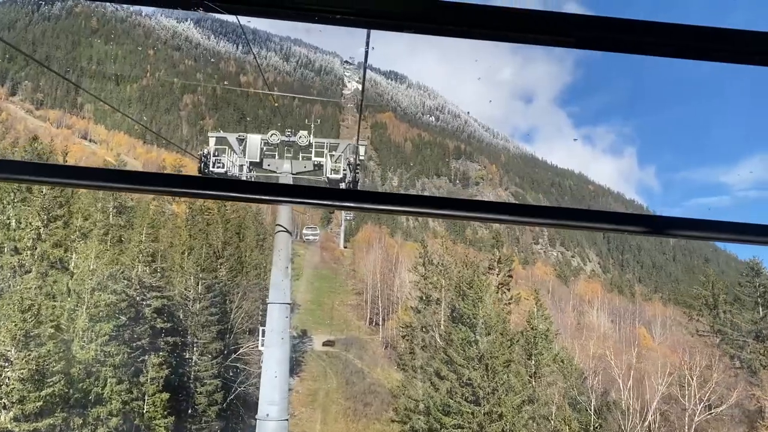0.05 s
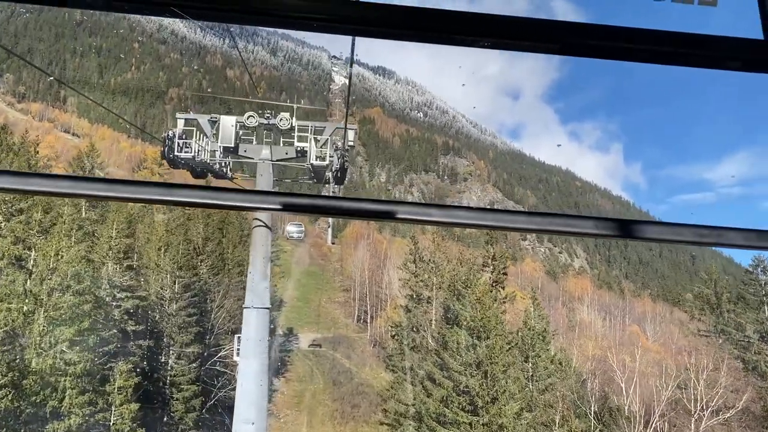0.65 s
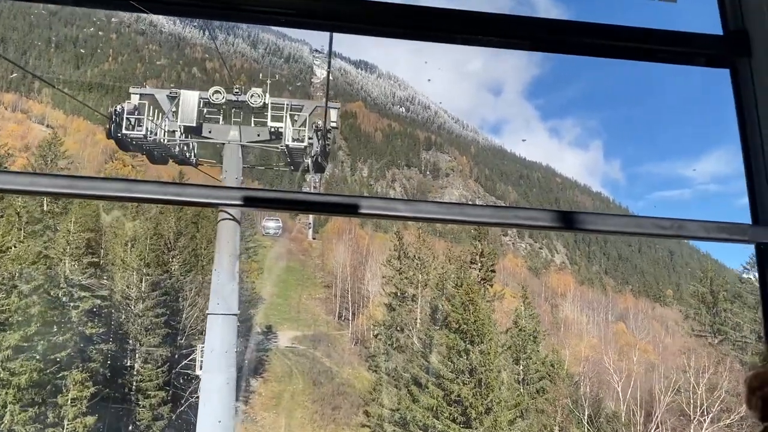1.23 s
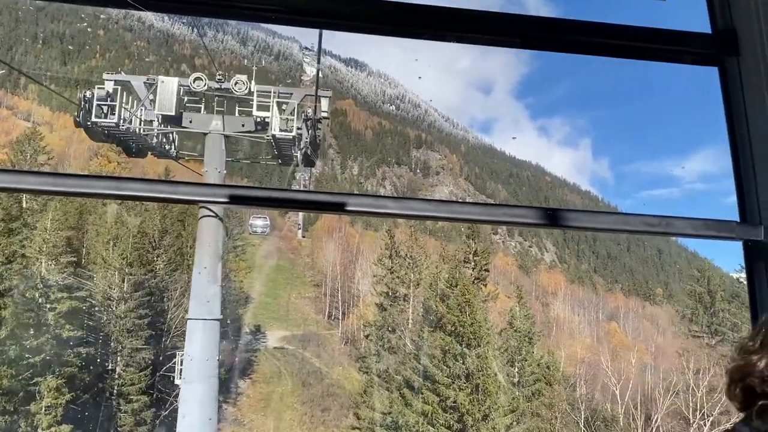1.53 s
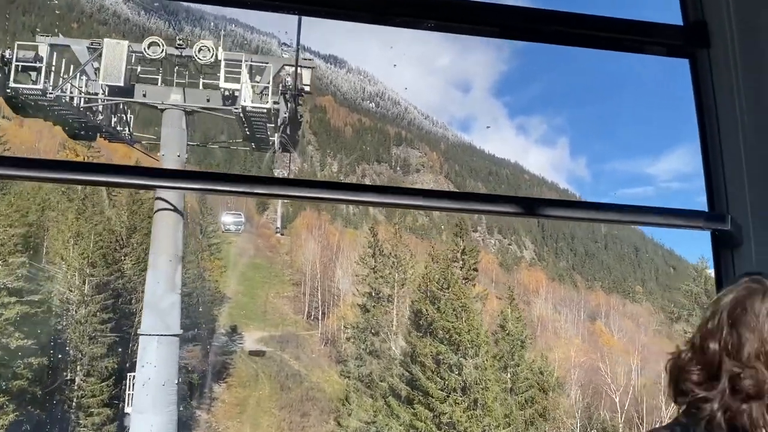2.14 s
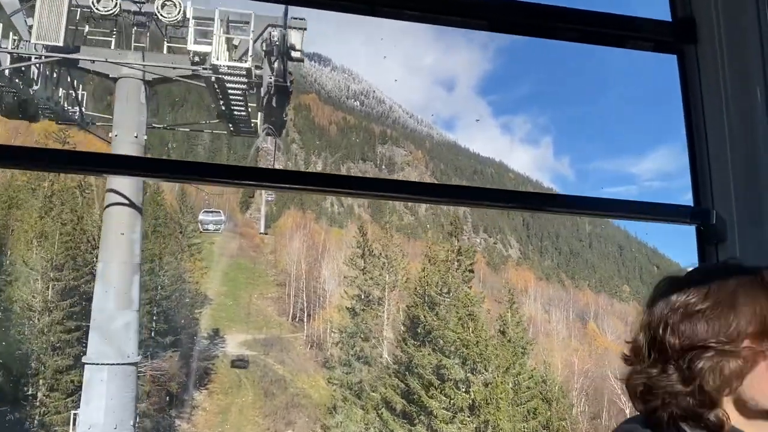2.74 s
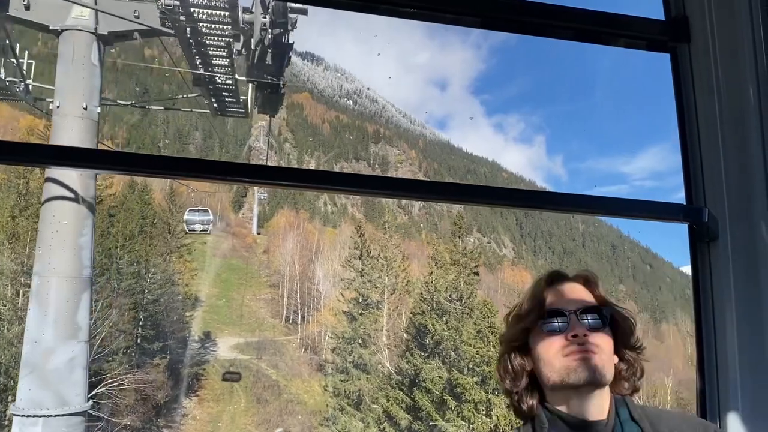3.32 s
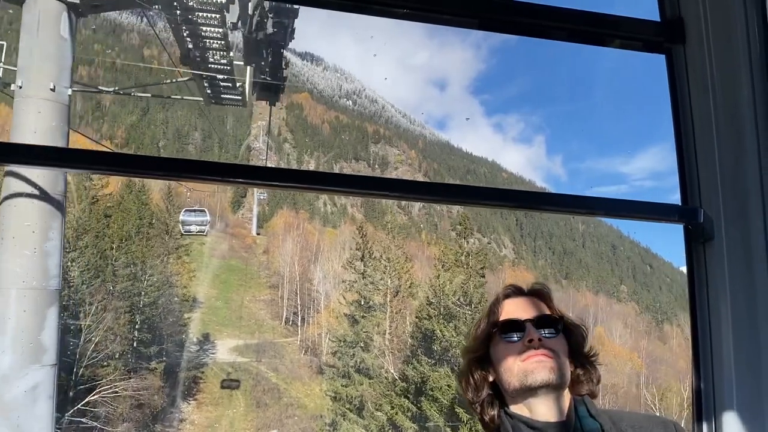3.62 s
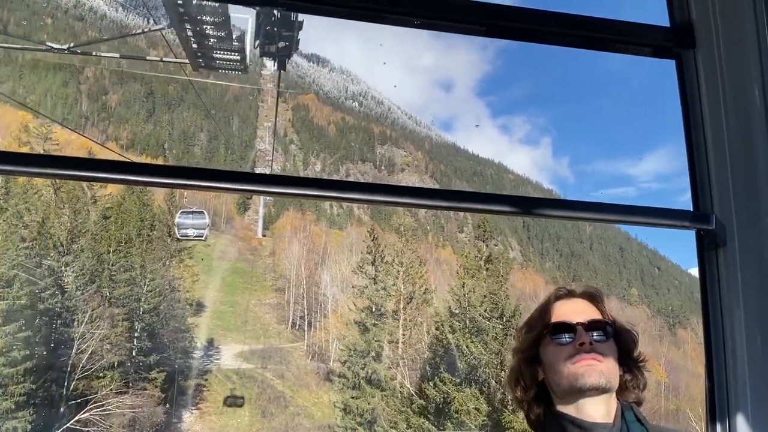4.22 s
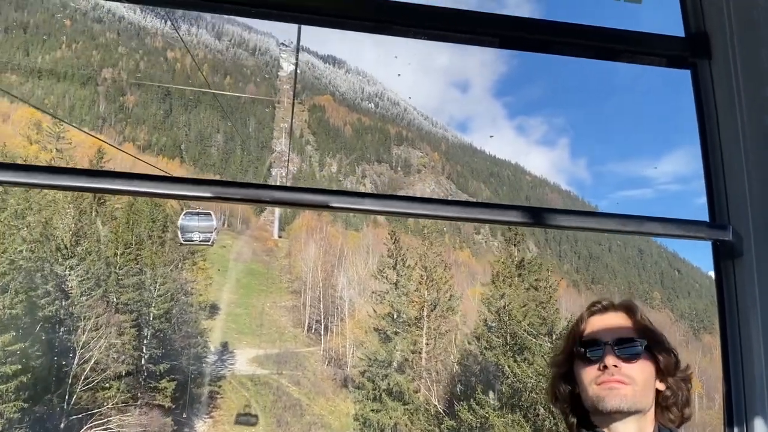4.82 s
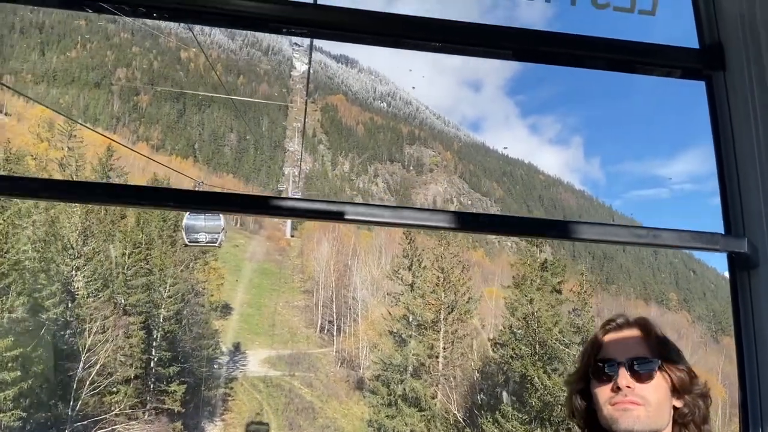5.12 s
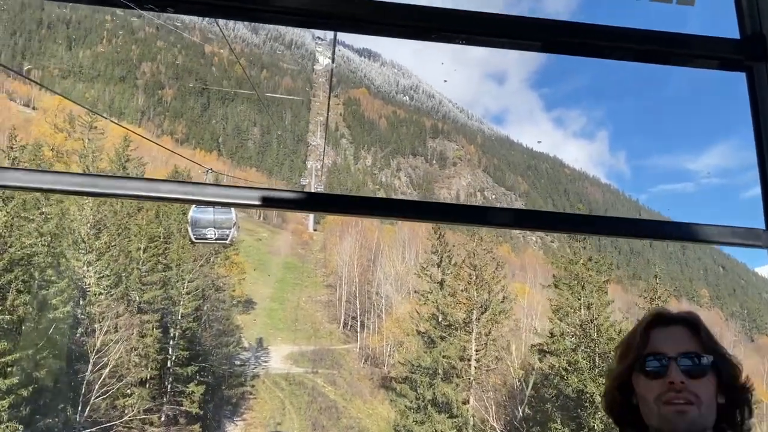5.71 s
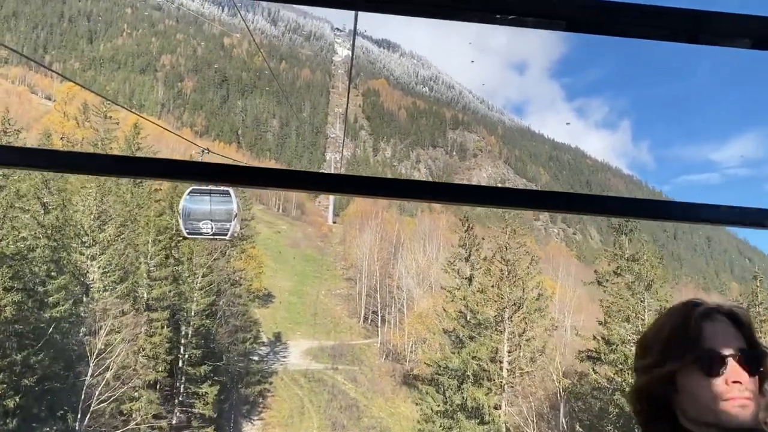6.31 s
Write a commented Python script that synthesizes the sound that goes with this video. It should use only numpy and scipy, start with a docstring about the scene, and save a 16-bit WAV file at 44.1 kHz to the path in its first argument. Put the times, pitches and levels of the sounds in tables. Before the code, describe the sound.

Inside a closed cable-car cabin, a low, throbbing hum from the cable runs throughout, over a soft rumble. Metal fittings click and ring lightly, most clearly at about 0.4, 1.1 and 1.4 seconds, with smaller knocks around 3 to 3.6 seconds. Clothing rustles faintly on and off. A brief low tone swells and sinks near 2 seconds. At about 4.5 seconds the cabin reaches a tower's wheels and the sound grows louder: a deep rumble with a rapid, uneven series of bumps, hollow panel thumps, sharp knocks and ticking trim. Around eight short, squeaky metallic creaks follow one another between 4.6 and 6 seconds, strongest near 5.0 and 5.7, while the hum stutters. After 6 seconds the shaking dies down, and the hum carries on slightly lower until the end at about 6.5 seconds. Everything sounds close and enclosed, as heard from a seat.

```python
"""Cable-car cabin passing a tower

The twisted rope runs over the tower's wheels and sends a throbbing hum down the hanger into the
closed cabin. Fittings click and ring, clothing rustles. From 4.5 s the grip rolls through the wheel
train: the cabin rumbles, each wheel creaks, loose panels thump and rattle. The hum ends a little lower."""
import sys
import numpy as np
from scipy import signal
from scipy.io import wavfile
from scipy.ndimage import uniform_filter1d

SR = 44100
rng = np.random.default_rng(int(sys.argv[2]) if len(sys.argv) > 2 else 0)


def bounce(signal):
    """Save signal as a 16-bit WAV file at the path given by the first command-line argument."""
    frames = np.transpose(np.atleast_2d(signal))
    limited = np.clip(frames, -1, 1)
    pcm = np.round(limited * 32767).astype(np.int16)
    wavfile.write(sys.argv[1], SR, pcm)


N = 288972
TIME = np.arange(N) / SR

# Table levels are relative; the functions add their own gains.
# cabin sound field (frequency [Hz], left-right correlation [-])
CORRELATION = [(60, 1), (130, 0.051), (300, 0.75), (640, -0.43), (1300, -0.46), (3000, -0.26),
               (7000, 0.076), (15000, 0.98)]
# cabin sound field (frequency [Hz], left minus right [dB])
BALANCE = [(30, 2), (90, 2.5), (250, 2), (900, 1.5), (4000, 3.5), (8000, -2), (13000, 0)]
# window reflections (left delay [s], right delay [s], gain [-])
WINDOW_ECHOES = [(.0023, 0.0011, 0.34), (.0047, 0.0037, 0.2), (.0071, 0.0094, 0.4), (0.013, 0.0065, 0.037)]

# rope hum (time [s], drone [Hz], base of upper partials [Hz])
ROPE_PITCH = [(0, 88.5, 86.8), (1.7, 89.2, 87.6), (2.3, 89.9, 88.3), (3.1, 89.8, 88.3), (3.5, 89.2, 88.1),
              (4.3, 89.4, 88.3), (4.7, 85.6, 87.4), (5.6, 85.4, 86.6), (6.1, 83.5, 85.9),
              (6.55, 83.4, 85.4)]
# slow and fast wheel against the drone (time [s], below [Hz], above [Hz])
WHEEL_DETUNE = [(0, 3.1, 5.6), (2.8, 3.22, 5.9), (4.5, 3.1, 5.75), (6.55, 2.6, 4.9)]
# drone position (time [s], left minus right [dB])
DRONE_PAN = [(1.15, 0), (2.08, -3), (4.36, -1.5), (4.71, -5), (6.55, -3.5)]
# brief drone dropouts (time [s], depth [dB])
DRONE_DIPS = [(1.421, 6), (2.277, 5), (2.99, 5.5), (4.65, 4.5), (4.76, 25), (4.82, -2.5), (5.02, 4.5),
              (5.14, 10), (5.25, 4.5), (5.5, 7.5), (5.36, 18), (5.44, 30), (5.78, 36), (5.951, 7),
              (6.188, 1.5), (6.37, 2.5)]
# hum partials 1 to 4 (time [s], level [dB])
DRONE_LEVEL = [(0, -19.5), (.12, -18), (.95, -17.5), (1.12, -21), (2.2, -23.5), (2.52, -20), (3.42, -19),
               (3.58, -22.5), (4.95, -22), (5.2, -18.5), (5.62, -18.5), (6.1, -20), (6.55, -22)]
OCTAVE_LEVEL = [(0, -66), (.11, -31.5), (.85, -33.5), (1.2, -40), (2.2, -41), (2.68, -38.5), (3.7, -42.5),
                (4.36, -32), (4.9, -41.5), (6.55, -44)]
THIRD_LEVEL = [(0, -40), (.4, -46.5), (.95, -52), (1.8, -41.5), (2.25, -49), (2.62, -38.5), (2.88, -36),
               (3.0, -50), (3.15, -40.5), (3.8, -43), (4.2, -46), (4.55, -33.5), (5.05, -41.5), (5.45, -40),
               (6.2, -38.5), (6.55, -41.5)]
FOURTH_LEVEL = [(0, -66), (.8, -56.5), (1.8, -48.5), (2, -59.5), (2.8, -54.5), (3.7, -55), (4, -43.5),
                (4.45, -49.5), (5.6, -53.5), (6.35, -45.5), (6.55, -50)]
# top partials (ratio to base [-], far from tower [dB], near tower [dB])
BUZZ_PARTIALS = [(4.943, -61, -58.5), (5.98, -62.5, -56.5)]

# ride on the open rope (time [s], shell shake [dB], roar [dB])
GLIDE_LEVELS = [(0, -36.5, -40), (.5, -39.5, -53), (.9, -31, -46.5), (1.55, -44.5, -53.5),
                (1.85, -34, -51.5), (2.25, -45, -54.5), (2.5, -42, -52.5), (2.95, -38, -45.5),
                (3.25, -37.5, -47), (4.4, -40.5, -46), (6.1, -38, -46), (6.55, -34, -48)]
# shell shake and wheel roar (frequency [Hz], density [dB])
SHAKE_SPECTRUM = [(17, 0.5), (24, -13.5), (33, -6), (44, -14.5), (55, -3.5), (70, -4), (85, -18.5),
                  (110, -34), (160, -43)]
ROAR_SPECTRUM = [(60, -11), (125, 17), (180, -4), (240, -0.5), (320, -4.5), (420, 1.5), (600, -2.5),
                 (1000, -8), (1500, -23), (2500, -21.5), (4000, -31.5), (9000, -34.5)]
# cabin air (frequency [Hz], width [Hz], level [dB])
AIR_MODES = [(98, 26.8, 6), (207.5, 27.3, 3), (259, 18.7, 4.5), (332.8, 25.3, -3.5), (445.6, 31, -8.5)]

# knocks of fittings and panels; body, metal, top and ring add to the level
# (time [s], level [dB], rise [s], body [dB], metal [dB], top [dB], ring pitch [Hz], ring [dB])
KNOCKS = [(0.042, -50, 0.00095, 25, -12, -40, 640, 11), (0.197, -46.5, 0.0092, 6, -7, -18, 2900, -5),
          (0.353, -38, 0.0035, 0, -5, -2.5, 3030, -1.5), (1.1044, -30.5, 0.0016, -3, -4.5, -20, 4350, 0.5),
          (1.202, -45, 0.007, 7, 0.5, -7, 1670, -4), (1.3961, -40, 0.0008, 4.5, 7, 2.5, 2530, 7),
          (1.403, -47, 0.00285, -4, 11, -5, 2470, 17), (2.022, -64, 0.002, 3, 0, -8, 3110, 2),
          (2.06, -63, 0.004, 5, -10, -1, 2300, -3), (2.698, -55.5, 0.002, 3, -4, -5, 2820, 2),
          (3.039, -56.5, 0.0084, 15.5, -6, -17, 1020, 15), (3.17, -54.5, 0.0023, 12, 8, -16, 1390, 11.5),
          (3.571, -46, 0.04, 5, 2.5, -21, 1020, -1), (4.558, -53, 0.02, 19, 9, 1, 1680, 4),
          (4.617, -53.5, 0.0013, 21.5, 5, -7, 1200, 11), (5.034, -46.5, 0.0036, 6, 0, -7, 1070, 7),
          (5.182, -40.5, 0.0025, 15.5, 0, 1.5, 990, 10.5), (5.451, -46, 0.014, -10, -14, 4.5, 5500, -8),
          (5.689, -42, 0.0011, 12, -9, -9, 4500, -14), (5.707, -47.5, 0.0014, 2, 2, -16, 1120, 23.5),
          (5.777, -41, 0.018, -9, -1, 0, 2030, -7), (5.86, -38.5, 0.006, -11, -11, -8, 3400, -6.5),
          (5.965, -42.5, 0.005, -3, -10, -16, 2020, -2), (6.005, -42.5, 0.014, -14, -7, -6, 3450, -6),
          (6.458, -48.5, 0.00079, 7, 4.5, -3.5, 2570, 9.5)]
# metal fitting (frequency [Hz], width [Hz], level [dB])
FITTING_MODES = [(1850, 230, 2.5), (2264, 120, 4), (2428, 37, 10), (2770, 190, 4), (3580, 410, 0),
                 (6000, 170, -5), (8200, 150, -20)]
# low, middle and high part of a knock (frequency [Hz], density [dB])
BODY_SPECTRUM = [(120, -3), (280, 0), (600, 7), (1100, 3), (1600, -3), (2400, -9.5), (4000, -33)]
CRACK_SPECTRUM = [(600, -20), (1500, 9), (2600, -5), (3600, 1), (4500, 4), (5800, -2), (7500, -1.5),
                  (15000, -37)]
TOP_SPECTRUM = [(2500, -18.5), (5000, -14), (7000, 4.5), (8600, -13.5), (10000, -5.5), (12500, -11.5),
                (15500, -10)]

# cloth rubbing (start [s], length [s], level [dB], attack [s], scrape re level [dB])
CLOTH_STROKES = [(0.087, 0.57, -55.5, 0.041, -9), (0.549, 0.63, -53, 0.065, -16),
                 (1.1, 0.86, -61, 0.055, -10), (2.466, 0.48, -55.5, 0.097, -15),
                 (2.754, 0.46, -49.5, 0.18, -4.5), (3.498, 0.57, -52, 0.069, -5.5),
                 (3.938, 0.52, -64.5, 0.081, -3), (4.488, 0.89, -62.5, 0.028, 1.5),
                 (5.139, 0.36, -56.5, 0.058, -7), (5.373, 0.24, -43.5, 0.069, -10),
                 (5.777, 0.84, -55, .05, -24)]
# cloth hiss (frequency [Hz], density [dB])
CLOTH_SPECTRUM = [(300, -2), (900, 10), (1500, 3.5), (3000, 0.5), (5000, -4), (6800, -1.5), (8600, -3.5),
                  (9800, -25), (12000, -16), (15500, -17.5)]
# brief low tone (time [s], pitch [Hz], level [dB])
LOW_TONE = [(1.82, 219.8, -100), (1.87, 212, -47), (1.92, 212, -31.5), (1.97, 207, -28), (2.03, 196, -37),
            (2.1, 202, -44), (2.18, 195.3, -100)]

# grip over each wheel
# (time [s], level [dB], decay [s], pitch [Hz], squeal re level [dB], its octave re level [dB])
WHEEL_PASSES = [(4.602, -44, 0.19, 1077, -10, -22), (4.784, -34, 0.07, 996, -4, -7),
                (4.949, -38, 0.048, 1245, -8, -14), (5.026, -29.5, 0.052, 1068, 2, -2),
                (5.26, -40.5, 0.087, 1040, -12, -0.5), (5.466, -34, 0.078, 1026, -2, -12),
                (5.695, -24, 0.055, 1105, 1.5, 0), (5.973, -46, 0.038, 1020, -10, 7)]
# wheel train and hanger (frequency [Hz], width [Hz], level [dB])
WHEEL_MODES = [(706, 63, 11.5), (975, 27.7, 13.5), (982, 16, 11.5), (1098, 30, 3.5), (1178, 60, 0),
               (1798, 47, 7), (1819, 10, 11.5), (1970, 16, -3), (2026, 30, -6), (2120, 33, -9),
               (2087, 29, -2), (2220, 16, -17), (2730, 49, -4)]
# flexing wall panels (time [s], level [dB], pitch [Hz])
PANEL_THUMPS = [(3.172, -31, 297), (4.619, -19.5, 284), (4.646, -25.5, 285), (4.9, -26.5, 333),
                (4.96, -19.5, 157), (5.139, -30, 212), (5.166, -28.5, 324), (5.257, -24.5, 257),
                (5.305, -20.5, 252), (5.426, -25.5, 261), (5.507, -23, 213), (5.6, -28, 303),
                (5.627, -24, 251), (5.653, -26, 242), (5.692, -20.5, 169), (5.84, -30, 320),
                (5.974, -25, 262), (6.041, -24.5, 200)]
# bumps through the hanger (time [s], level [dB])
JOLTS = [(4.649, -12), (4.713, -15), (4.782, -17), (4.817, -13), (4.875, -22), (4.941, -15), (5.097, -16),
         (5.18, -19), (5.308, -7.5), (5.365, -14), (5.452, -8.5), (5.508, -9.5), (5.562, -13.5),
         (5.715, -11.5), (5.759, -18.5), (5.8, -14.5), (5.857, -25), (5.974, -17.5)]
# cabin shell (frequency [Hz], level [dB], T60 [s])
SHELL_MODES = [(25.3, -12, 0.38), (46, -3, 0.18), (69.5, 2, 0.22)]


def from_db(db):
    """Decibels to gain."""
    return 10 ** (np.asarray(db) / 20)


def unit_rms(x):
    """Scale to rms 1."""
    return x / np.sqrt(np.mean(x ** 2) + 1e-20)


def curves(rows):
    """Columns of a time table, interpolated per sample."""
    times_s, *columns = np.transpose(rows)
    return [np.interp(TIME, times_s, column) for column in columns]


def at_hz(rows, hz):
    """Table value on a log-frequency axis."""
    table_hz, values = np.transpose(rows)
    return np.interp(np.log(hz), np.log(table_hz), values)


def pan(db):
    """Stereo gains for a left-minus-right level."""
    return from_db(db / 2 * np.array([[1], [-1]]))


def drift(rate_hz):
    """Low-passed random wander, rms 1."""
    step, warmup = 40, 2000
    pole = np.exp(-2 * np.pi * rate_hz * step / SR)
    white = rng.standard_normal(N // step + warmup + 2)
    slow = signal.lfilter([1], [1, -2 * pole, pole * pole], white)[warmup:]
    return np.interp(np.arange(N) / step, np.arange(len(slow)), unit_rms(slow))


def spread(mid, side, hz):
    """Mix two unrelated signals to the cabin's stereo field at hz."""
    correlation = at_hz(CORRELATION, hz)
    stereo = np.sqrt(1 + correlation) * mid + np.sqrt(1 - correlation) * side * [[1], [-1]]
    return stereo * pan(at_hz(BALANCE, hz))


def noise(spectrum, flicker_db=0):
    """Stereo noise in half-octave bands, each with its own level and flicker; rms 1."""
    edges_hz = 17 * 2 ** np.arange(0, 10.1, 0.5)
    out, white = 0, rng.standard_normal((2, 2, N))
    for k, (low, high) in enumerate(zip(edges_hz, edges_hz[1:])):
        hz = np.sqrt(low * high)
        wander_db = flicker_db * drift(9.2) if flicker_db else 0
        if high > spectrum[0][0] and low < spectrum[-1][0]:
            band = signal.butter(2, [low, high], "band", fs=SR, output="sos")
            mid, side = signal.sosfilt(band, white[k % 2])
            out += from_db(at_hz(spectrum, hz) + wander_db) * spread(mid, side, hz)
    return unit_rms(out)


def resonate(x, hz, width_hz):
    """Two-pole resonance, peak gain 1."""
    r = np.exp(-np.pi * width_hz / SR)
    poles = [1, -2 * r * np.cos(2 * np.pi * hz / SR), r * r]
    return signal.lfilter(np.array([1, 0, -1]) * (1 - r * r) / 2, poles, x + 1e-18)


def ring_modes(drive, modes):
    """Two drive rows through modes of alternating sign; stereo, rms 1."""
    out = 0
    for k, (hz, width_hz, db) in enumerate(modes):
        out += (-1) ** k * from_db(db) * spread(*resonate(drive, hz, width_hz), hz)
    return unit_rms(out)


def grains(per_s, size_db):
    """Tiny random contacts of uneven strength; two rows, rms 1."""
    sizes = from_db(size_db * np.minimum(rng.exponential(1, (2, N)), 4))
    signs = rng.choice([-1, 1], (2, N))
    return unit_rms(sizes * signs * (rng.random((2, N)) < per_s / SR))


def gate(start_s, attack_s, end_s, release_s):
    """Trapezoid: 0 at start_s and end_s, holding at 1 between."""
    return np.clip(np.minimum((TIME - start_s) / attack_s, (end_s - TIME) / release_s), 0, 1)


def strike(rise_s, t60_s):
    """One second of rise and decay, peak 1."""
    age_s = TIME[:SR]
    shape = (1 - np.exp(-age_s / rise_s)) * from_db(-60 * age_s / t60_s)
    return shape / shape.max()


def on_tower():
    """1 with the grip on the wheels, 0 on the open rope."""
    return gate(start_s=4.53, attack_s=0.033, end_s=6.35, release_s=0.47)


def window_echoes(x):
    """Short reflections off the windows colour the sound."""
    out = x.copy()
    for *delays_s, gain in WINDOW_ECHOES:
        for ear in range(2):
            out[ear] += gain * np.interp(TIME - delays_s[ear], TIME, x[ear], left=0)
    return out / np.sqrt(1 + sum(gain ** 2 for *_, gain in WINDOW_ECHOES))


def drone(slow_db=-19, fast_db=-13.5, in_phase_s=0.288, dip_s=0.04, flutter_db=1.5, shake_turns=0.031):
    """Three wheels at nearly one pitch beat; the tower shakes level and phase."""
    hz, _ = curves(ROPE_PITCH)
    below_hz, above_hz = curves(WHEEL_DETUNE)
    db, = curves(DRONE_LEVEL)
    pan_db, = curves(DRONE_PAN)
    db += flutter_db * on_tower() * drift(25)
    db -= sum(depth_db * np.exp(-((TIME - at_s) / dip_s) ** 2) for at_s, depth_db in DRONE_DIPS)
    turns = np.cumsum(hz) / SR + shake_turns * on_tower() * drift(7.7)
    out = 0
    for offset_hz, wheel_db in [(np.zeros(N), 0), (-below_hz, slow_db), (above_hz, fast_db)]:
        beat_turns = np.cumsum(offset_hz) / SR
        beat_turns -= np.interp(in_phase_s, TIME, beat_turns)
        out += from_db(wheel_db) * np.sin(2 * np.pi * (turns + beat_turns))
    return np.sqrt(2) * from_db(db) * pan(pan_db) * out


def hum_octave(ratio=2.01, twin_db=-40, twin_below_hz=4.83, in_phase_s=0.13, twin_end_s=2.29,
               twin_fade_s=0.67, gain_db=0.5, waver_db=1, damping_db=4):
    """The octave beats with a lower twin at first and is damped on the tower."""
    _, base_hz = curves(ROPE_PITCH)
    db, = curves(OCTAVE_LEVEL)
    turns = ratio * np.cumsum(base_hz) / SR + np.array([[0], [0.085]])  # right ear leads
    tone = from_db(db) * np.sin(2 * np.pi * turns)
    twin = from_db(twin_db) * np.sin(2 * np.pi * (turns - twin_below_hz * (TIME - in_phase_s)))
    twin *= np.clip((twin_end_s - TIME) / twin_fade_s, 0, 1)
    return np.sqrt(2) * from_db(gain_db + waver_db * drift(4) - damping_db * on_tower()) * (tone + twin)


def hum_partial(levels, ratio, gain_db, twin_db, twin_below_hz, waver_db, waver_turns, rough_db=2):
    """A rough partial; a second wheel just below it makes it swell unevenly."""
    _, base_hz = curves(ROPE_PITCH)
    db, = curves(levels)
    turns = ratio * np.cumsum(base_hz) / SR
    twin_turns = turns - twin_below_hz * TIME + 0.27 * drift(1.29)
    pair = np.exp(2j * np.pi * turns) + from_db(twin_db) * np.exp(2j * np.pi * twin_turns)
    mid_side = []
    for _ in range(2):
        gain = from_db(db + gain_db + waver_db * drift(2.4) + rough_db * drift(25))
        shift_turns = waver_turns * drift(6.1) + rng.random()
        mid_side.append(gain * np.imag(pair * np.exp(2j * np.pi * shift_turns)))
    return spread(*mid_side, ratio * np.mean(base_hz))


def strand_buzz(peak_s=6.2, approach_s=5.8, waver_db=4, waver_turns=0.14):
    """Passing strands drive wavering top partials that grow as the tower nears."""
    _, base_hz = curves(ROPE_PITCH)
    nearness = np.maximum(0, 1 - np.abs(TIME - peak_s) / approach_s)
    turns, out = np.cumsum(base_hz) / SR, 0
    for ratio, far_db, near_db in BUZZ_PARTIALS:
        db = far_db + (near_db - far_db) * nearness
        mid_side = []
        for _ in range(2):
            gain = from_db(db + waver_db * drift(9.1))
            shift_turns = waver_turns * drift(7.6) + rng.random()
            mid_side.append(gain * np.sin(2 * np.pi * (ratio * turns + shift_turns)))
        out += spread(*mid_side, ratio * np.mean(base_hz))
    return out


def ride_gain(glide_db, tower_db, jolt_db, rise_s=0.012, settle_s=0.031):
    """Power sum of glide, wheel train and settling jolts."""
    stir = 0
    for at_s, db in JOLTS:
        age_s = np.maximum(TIME - at_s, 0)
        stir += from_db(db) * np.minimum(age_s / rise_s, 1) * np.exp(-age_s / settle_s)
    tower = from_db(tower_db) * on_tower()
    return np.sqrt(from_db(glide_db) ** 2 + tower ** 2 + (from_db(jolt_db) * stir) ** 2)


def rumble(roar_db=4, boom_db=7, tower_boom_db=3):
    """The shell shakes on its hanger; panels radiate wheel roar, which booms in the cabin air."""
    glide_shake_db, glide_roar_db = curves(GLIDE_LEVELS)
    shake_gain = ride_gain(glide_shake_db, tower_db=-24.5, jolt_db=-13)
    roar_gain = ride_gain(glide_roar_db, tower_db=-44, jolt_db=-28)
    shake = noise(SHAKE_SPECTRUM)
    shake /= np.sqrt(uniform_filter1d(np.mean(shake ** 2, axis=0), size=5000) + 1e-9)  # steady rms
    boom = ring_modes(rng.standard_normal((2, N)), AIR_MODES)
    boom *= from_db(boom_db + tower_boom_db * on_tower())
    roar = from_db(roar_db) * window_echoes(noise(ROAR_SPECTRUM, flicker_db=2.34))
    return shake_gain * shake + roar_gain * (roar + boom)


def knock_envelope(levels_db, t60_s, snap_db, snap_s=0.0054, snap_rise_s=0.00028, hard_rise_s=0.0031):
    """Each knock rises and decays; hard ones open with a snap."""
    out, age_s = np.zeros(N + SR), TIME[:SR]
    snap = from_db(snap_db) * (1 - np.exp(-age_s / snap_rise_s)) * np.exp(-age_s / snap_s)
    for (at_s, _, rise_s, *_), db in zip(KNOCKS, levels_db):
        hardness = np.exp(-rise_s / hard_rise_s)
        out[round(at_s * SR):][:SR] += from_db(db) * (strike(rise_s, t60_s) + hardness * snap)
    return out[:N]


def knocks(gain_db=-4, top_gain_db=-4):
    """Contacts with a noisy decay in the cabin; some set a metal fitting ringing."""
    _, db, _, body_db, metal_db, top_db, *_ = np.transpose(KNOCKS)
    metal = ring_modes(rng.standard_normal((2, N)), FITTING_MODES)
    metal *= knock_envelope(db + metal_db, t60_s=0.18, snap_db=3)
    body = noise(BODY_SPECTRUM) * knock_envelope(db + body_db, t60_s=0.14, snap_db=-6)
    crack = noise(CRACK_SPECTRUM) * knock_envelope(db, t60_s=0.21, snap_db=6)
    top = noise(TOP_SPECTRUM)
    top *= knock_envelope(db + top_db + top_gain_db, t60_s=0.16, snap_db=19, snap_s=0.0021)
    return from_db(gain_db) * (metal + body + crack + top)


def part_rings(gain_db=-5, width_share=0.19, t60_s=0.1, contact_db=22):
    """Each struck part rings at its own pitch: the contact, then diffuse wall echoes."""
    out = np.zeros((2, N + SR))
    for at_s, db, rise_s, *_, hz, ring_db in KNOCKS:
        envelope = strike(rise_s, t60_s)
        drive = rng.standard_normal((2, SR)) * envelope
        drive[:, np.argmax(envelope) // 2] += from_db(contact_db)
        width_hz = width_share * hz
        ring = resonate(resonate(drive, hz, width_hz), hz, width_hz)
        ring *= np.sqrt(2 * SR / (np.pi * width_hz))  # same power at any width
        out[:, round(at_s * SR):][:, :SR] += from_db(db + ring_db + gain_db) * ring
    return out[:, :N]


def cloth_rustle(rub_db=3, floor_db=-65, release_s=0.18, grain_db=1, crackle_db=-16,
                 scrape_hz=2000, scrape_width_hz=1300):
    """Rubbing cloth: strokes of grainy hiss and fine crackle; firm ones also scrape."""
    rub_power, scrape_power = from_db(floor_db) ** 2, 0
    for start_s, length_s, db, attack_s, scrape_db in CLOTH_STROKES:
        stroke = from_db(db) * gate(start_s, attack_s, start_s + length_s, release_s)
        rub_power += stroke ** 2
        scrape_power += (from_db(scrape_db) * stroke) ** 2
    hiss = noise(CLOTH_SPECTRUM, flicker_db=1) * from_db(grain_db * drift(60))
    crackle = unit_rms(resonate(grains(per_s=370, size_db=5.5), hz=7700, width_hz=7500))
    rub = from_db(rub_db) * (hiss + from_db(crackle_db) * crackle)
    scrape = resonate(grains(per_s=900, size_db=4), scrape_hz, scrape_width_hz)
    scrape = unit_rms(resonate(scrape, scrape_hz, scrape_width_hz))
    return np.sqrt(rub_power) * rub + np.sqrt(scrape_power) * scrape


def low_tone():
    """A short pure tone swells and sinks in pitch."""
    hz, db = curves(LOW_TONE)
    return np.sqrt(2) * from_db(db) * np.sin(2 * np.pi * np.cumsum(hz) / SR)


def trim_rattle(level_db=-57, hz=3200):
    """Loose trim ticks at random while the grip is on the wheels."""
    ticks = resonate(grains(per_s=35, size_db=-3), hz, width_hz=4500)
    echoed = window_echoes(window_echoes(spread(*ticks, hz)))
    return from_db(level_db) * on_tower() * unit_rms(echoed)


def wheel_load(at_s, db, decay_s, rise_s):
    """Load on one wheel: quick rise, rounded release."""
    age_s = np.maximum(TIME - at_s, 0)
    release = np.exp(-np.minimum(age_s / decay_s, 10) ** 1.08)
    return from_db(db) * (1 - np.exp(-age_s / rise_s)) * release


def wheel_creak(gain_db=-1.5, chatter_db=3, width_hz=230, broadband_db=-19):
    """The grip chatters over each wheel; the creak and its octave ring the steel train."""
    contacts = grains(per_s=900, size_db=3) * from_db(chatter_db * drift(39))
    total_load, drive = 0, 0
    for at_s, db, decay_s, hz, *_ in WHEEL_PASSES:
        load = wheel_load(at_s, db, decay_s, rise_s=0.008)
        total_load += load
        chatter = contacts * load
        creak = resonate(chatter, hz, width_hz) + resonate(chatter, 2 * hz, width_hz)
        drive += creak + from_db(broadband_db) * chatter
    return from_db(gain_db) * ring_modes(drive, WHEEL_MODES) * np.sqrt(np.mean(total_load ** 2))


def wheel_squeal(gain_db=-4, jitter_hz=32, rough_db=3, sag_share=0.07, sag_s=0.0907):
    """Stick-slip of the lining: an unsteady tone and octave that sink as the wheel unloads."""
    wander_hz = jitter_hz * np.array([drift(107.9), drift(107.2)])
    out = 0
    for at_s, db, decay_s, hz, squeal_db, octave_db in WHEEL_PASSES:
        sag = sag_share * (1 - np.exp(-np.maximum(TIME - at_s, 0) / sag_s))
        phase = 2 * np.pi * np.cumsum(hz * (1 - sag) + wander_hz, axis=1) / SR
        tone = from_db(squeal_db) * np.sin(phase) + from_db(octave_db) * np.sin(2 * phase)
        out += wheel_load(at_s, db, 0.9 * decay_s, rise_s=0.019) * tone
    return from_db(gain_db + rough_db * drift(90)) * out


def panel_thumps(side_db=-7):
    """Flexing panels give short hollow notes, slightly different at each ear."""
    out, age_s = np.zeros((2, N + SR)), TIME[:SR]
    envelope = strike(rise_s=0.0017, t60_s=0.048)
    for at_s, db, hz in PANEL_THUMPS:
        mid = np.sin(2 * np.pi * hz * age_s)
        side = from_db(side_db) * np.sin(2 * np.pi * (hz * age_s + rng.random()))
        out[:, round(at_s * SR):][:, :SR] += from_db(db) * envelope * (mid + side * [[1], [-1]])
    return out[:, :N]


def jolts(mount_band_hz=(14, 80)):
    """Heavy bumps swing the shell's low modes; rubber mounts soften the blow."""
    out, age_s = np.zeros(N + SR), TIME[:SR]
    swing = sum(from_db(db - 60 * age_s / t60_s) * np.sin(2 * np.pi * hz * age_s)
                for hz, db, t60_s in SHELL_MODES)
    for at_s, db in JOLTS:
        out[round(at_s * SR):][:SR] -= from_db(db) * swing
    mounts = signal.butter(4, mount_band_hz, "band", fs=SR, output="sos")
    return signal.sosfilt(mounts, out[:N])


def scene():
    """Stereo mix at a seat in the cabin."""
    third = hum_partial(THIRD_LEVEL, ratio=2.99, gain_db=-4, twin_db=-10.5, twin_below_hz=4,
                        waver_db=0.5, waver_turns=0.06)
    fourth = hum_partial(FOURTH_LEVEL, ratio=3.967, gain_db=-4.5, twin_db=-4, twin_below_hz=3.6,
                         waver_db=3.5, waver_turns=0.046)
    hum = drone() + hum_octave() + third + fourth + strand_buzz()
    shell = rumble() + jolts() + panel_thumps() + trim_rattle()
    wheels = (wheel_creak() + wheel_squeal()) * pan(db=1.2)
    fittings = (knocks() + part_rings()) * pan(db=0.65)
    clothing = window_echoes(cloth_rustle()) * pan(db=-1.5)
    return hum + shell + fittings + clothing + low_tone() + wheels


def record(dry, fade_s=0.004, cutoff_hz=15900):
    """Quick fade-in, steep low-pass."""
    lowpass = signal.ellip(10, 0.1, 90, cutoff_hz, fs=SR, output="sos")
    return signal.sosfilt(lowpass, dry * np.minimum(TIME / fade_s, 1))


dry = scene()
out = record(dry)
bounce(out)
```